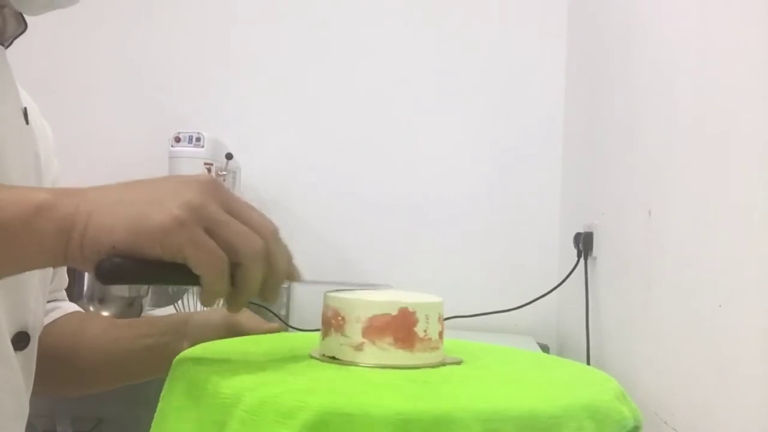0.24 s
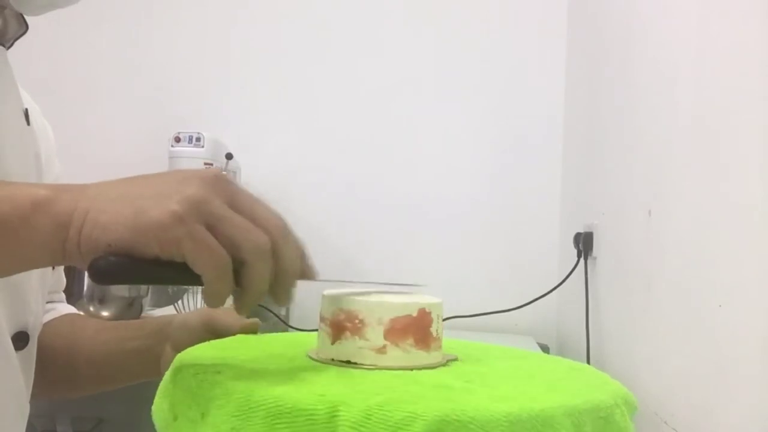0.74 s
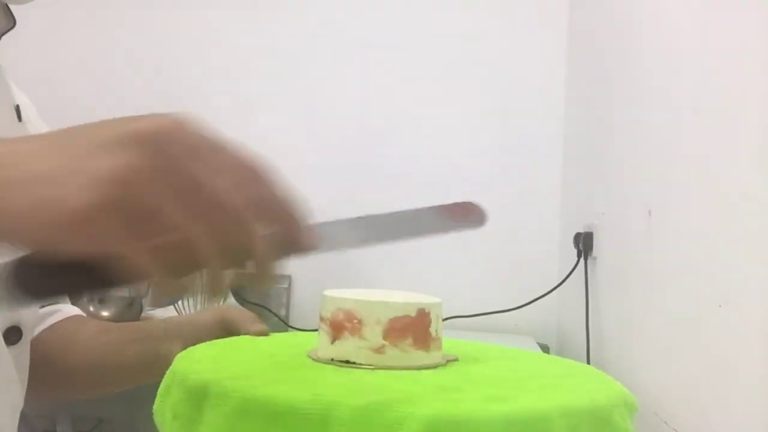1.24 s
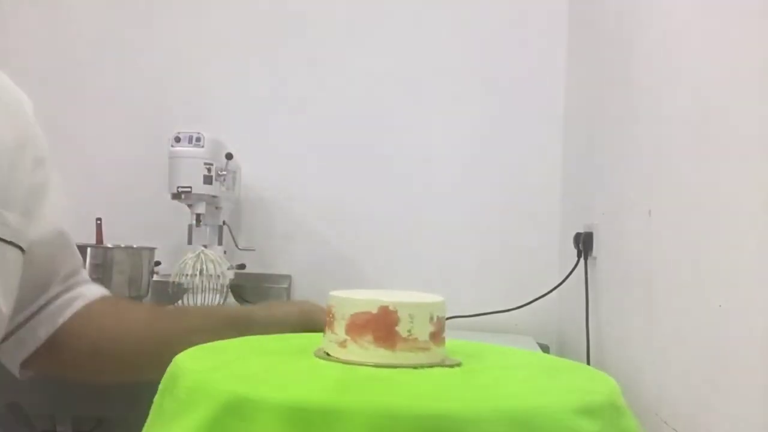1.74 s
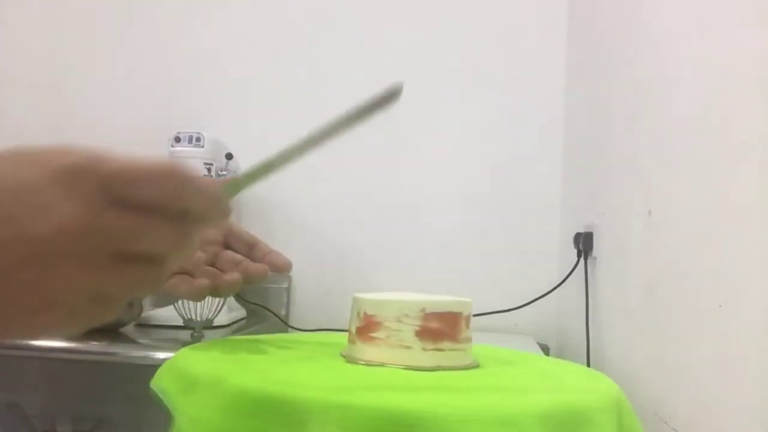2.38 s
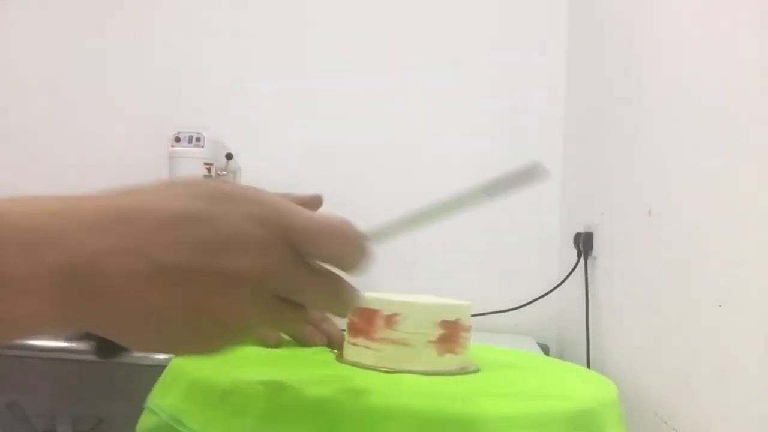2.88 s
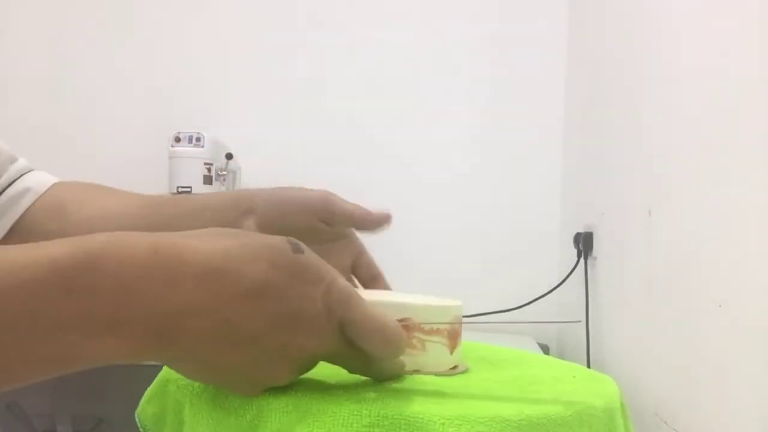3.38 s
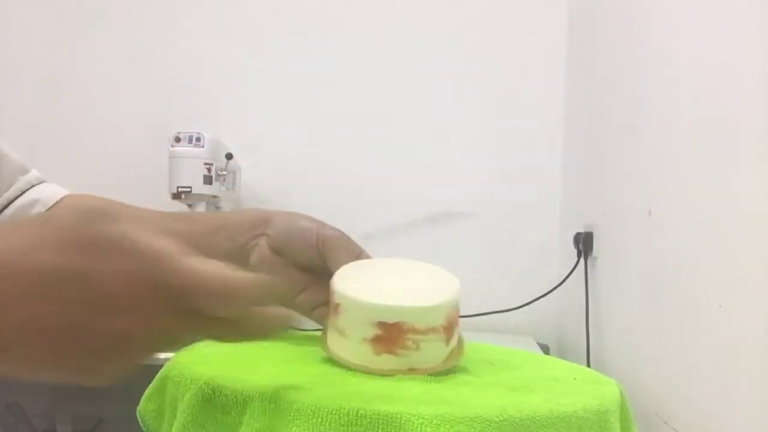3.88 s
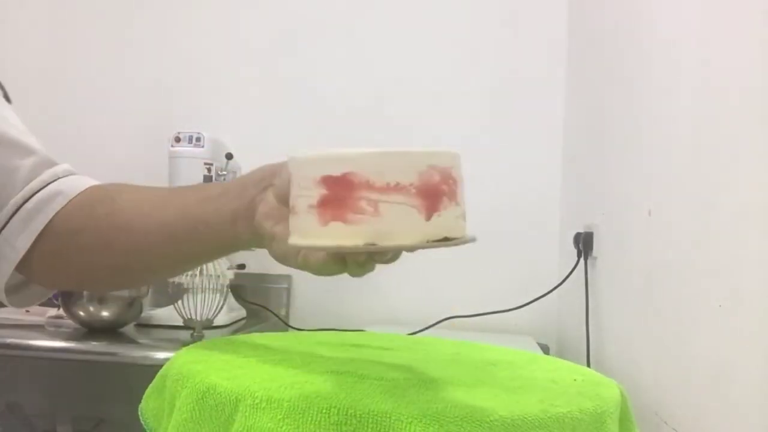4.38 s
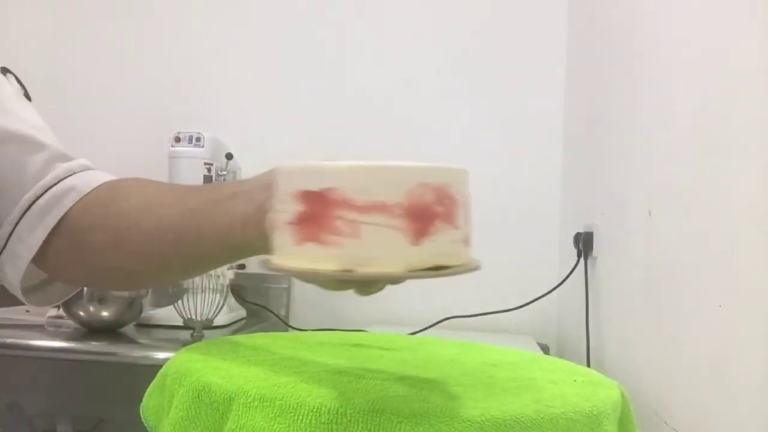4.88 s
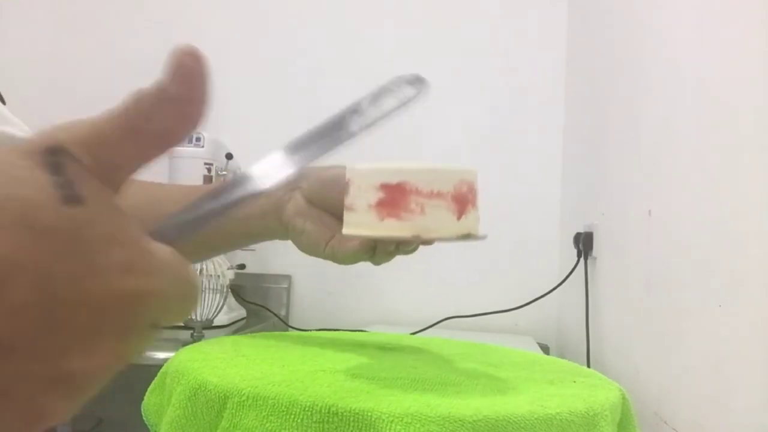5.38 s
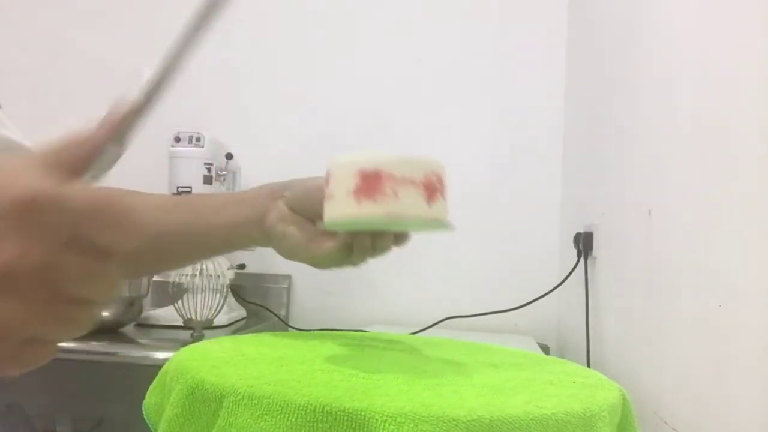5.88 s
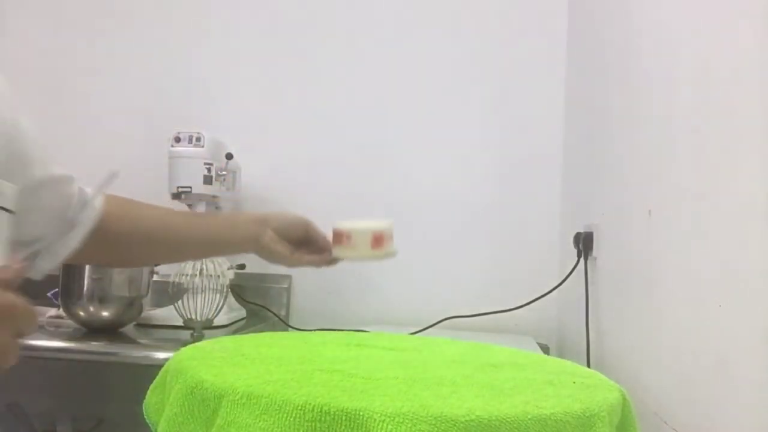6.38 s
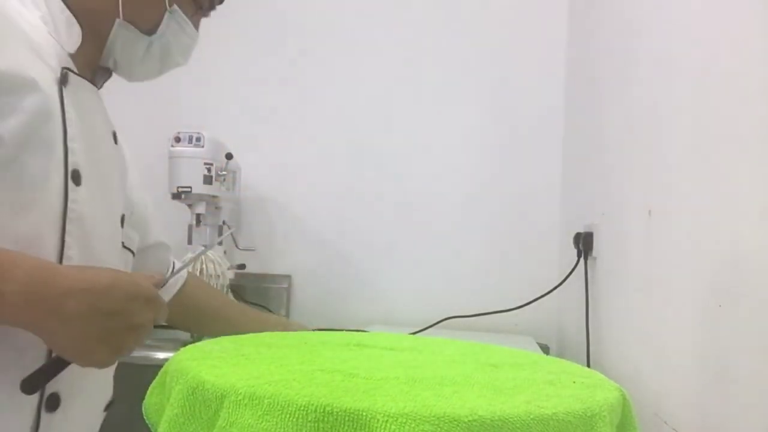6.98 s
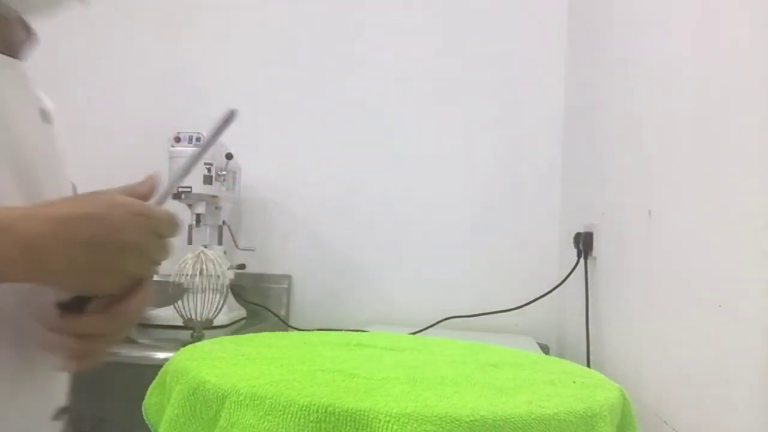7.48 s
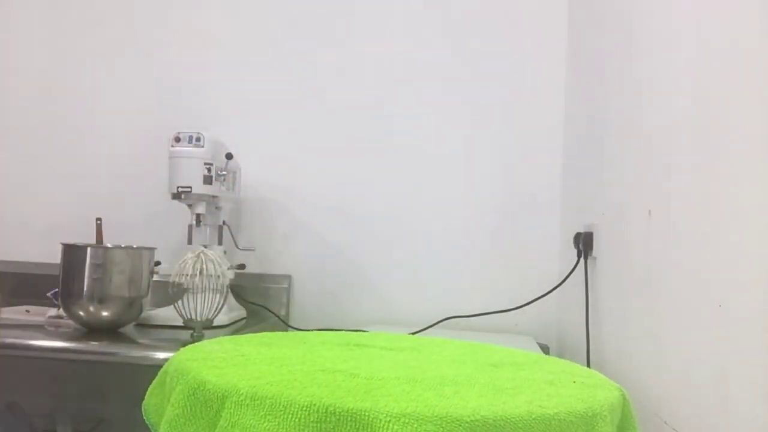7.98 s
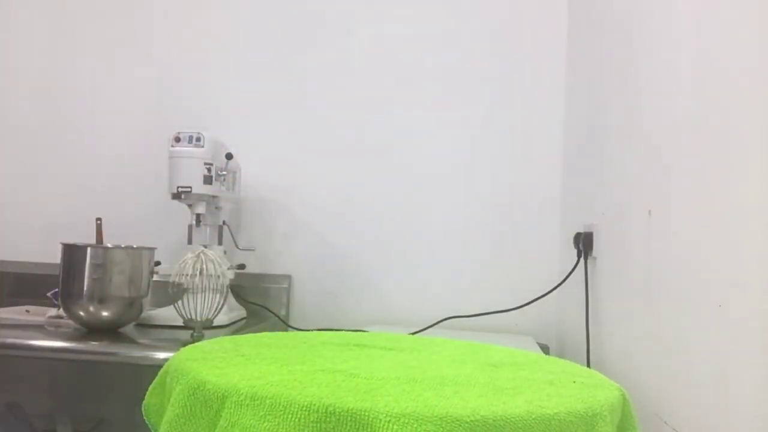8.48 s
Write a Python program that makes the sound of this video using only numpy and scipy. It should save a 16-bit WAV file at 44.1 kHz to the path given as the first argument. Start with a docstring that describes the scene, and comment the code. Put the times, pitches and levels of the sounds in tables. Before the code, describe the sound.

In a small bare-walled kitchen, a refrigerator hums low and slowly throbs, with a soft airy fan and faint fluttering electronic hiss. A clock ticks about once a second, each tick followed by a weaker one. Early on, a cake turntable rumbles under repeated pushes with a soft thud; later come faint knife clicks and small knocks, then only hum and ticking. Mono, slightly dull microphone close to the table.

```python
"""Small pastry kitchen: a refrigerator compressor hums and beats against the mains (summed cosines), its fan
stirs the air (shaped noise, wavering tones), and electronics add a thin hiss pulsing 30 times a second.
A cake turntable rumbles when pushed (swelling noise) amid soft knocks; a wall clock ticks (struck modes).
A palette knife clicks as the cake is lifted off (struck modes); late on, a sleeve brushes past (high noise).
"""
import sys
import numpy as np
from scipy import signal
from scipy.fft import rfft, irfft
from scipy.io import wavfile

SR = 44100
rng = np.random.default_rng(int(sys.argv[2]) if len(sys.argv) > 2 else 0)


def generate_wav(signal):
    """Clip the signal to [-1, 1] and save it as 16-bit WAV at the path in sys.argv[1]."""
    frames = np.transpose(np.atleast_2d(signal))
    scaled = np.clip(frames, -1, 1) * 32767
    pcm = np.round(scaled).astype(np.int16)
    wavfile.write(sys.argv[1], SR, pcm)


N = 385434
TIME = np.arange(N) / SR
FREQS = np.maximum(np.arange(N // 2 + 1) * SR / N, 1)

# compressor shaft orders: shaft_multiple, rms_db (once settled)
COMPRESSOR_ORDERS = [(1, -39.5), (2, -51.4), (3, -63), (4, -63), (8, -66.5), (11, -64.5)]
# fan tones: pitch_hz, nominal_rms_db
FAN_TONES = [(115.9, -56.5), (172.3, -58.5), (231.8, -60.5), (373, -61.5), (776, -77)]
# broadband rush of the fan: freq_hz, db_per_hz
AIR_SPECTRUM = [(15, -92.5), (33, -85.5), (52, -76), (85, -68), (135, -76.5), (300, -75.5), (400, -79.5),
                (450, -84), (600, -78), (950, -86.5), (1800, -92.5), (2300, -101), (3200, -113),
                (4900, -129), (9000, -150)]
# cabinet and room resonances added to the rush: freq_hz, width_hz, peak_db_per_hz
AIR_MODES = [(238.3, 17.6, -69), (337.8, 11, -68), (373.6, 13.4, -65.5), (1217, 97, -86.5),
             (2140, 410, -92), (3715, 180, -110), (4190, 390, -118)]
# steady electronic hiss: freq_hz, db_per_hz
HISS_SPECTRUM = [(2500, -122), (4000, -119), (4900, -129), (5300, -118.5), (5800, -119), (6400, -115),
                 (7600, -117.5), (8300, -122), (9600, -123.5), (10400, -129), (11200, -127), (14400, -126)]
# pulsed hiss at the crest of a pulse: freq_hz, db_per_hz
PULSE_SPECTRUM = [(1000, -105), (2200, -87.5), (3100, -107), (4000, -109), (4900, -120), (5500, -113),
                  (6600, -109), (7800, -112), (9200, -126), (14000, -138)]
# hand pushes the turntable or shifts the cake on it: peak_s, rumble_rms_db
PUSHES = [(.05, -43), (.85, -51), (1.13, -46.5), (1.68, -45), (1.88, -43), (2.17, -42), (2.42, -42.5),
          (2.96, -48), (3.14, -48), (3.35, -43)]
# turntable rumble, shape only: freq_hz, relative_db_per_hz
RUMBLE_SPECTRUM = [(20, -36), (36, -20), (52, 15.5), (75, 7.5), (110, -14), (170, -12), (300, -18.5),
                   (800, -78)]
# soft knocks on the table: start_s, strike_db, pitch_hz, t60_s
KNOCKS = [(1.845, -32.5, 139, .07), (4.659, -33, 290, 0.032), (6.762, -38, 270, 0.072)]
# clock case modes: pitch_hz, relative_db, t60_s
CLOCK_MODES = [(673, -56, .02), (1807, -33.5, 0.0077), (2140, -30, 0.009), (4070, -60.5, 0.0088),
               (6400, -55.5, .007), (7000, -57, .007), (7760, -57.5, 0.0052)]
# palette knife clicks: start_s, handle_strike_db, blade_strike_db
KNIFE_CLICKS = [(2.596, -56, -60), (4.7915, -41.5, -65), (4.7965, -45, -59), (5.1138, -60, -51)]
# blade modes: pitch_hz, relative_db, t60_s
BLADE_MODES = [(5400, -6, .007), (6300, -0.5, 0.0054), (7500, -5, .005), (9000, -4, 0.0033),
               (11200, -10.5, .003), (13000, -13, .003)]
# cloth swish, shape only: freq_hz, relative_db_per_hz
CLOTH_SPECTRUM = [(5000, -38), (8000, -4), (9500, 9), (13000, 4), (15000, -1)]

# the lowest order starts weak; HUM_SETTLE_S is a time constant
SHAFT_HZ, SLIP_HZ, IN_STEP_S = 49.37, 0.5834, 0.513
MAINS_HUM_RMS_DB, HUM_START_DB, HUM_SETTLE_S = -44.5, -4.5, 2.6
PULSE_RATE_HZ = 30
PUSH_RISE_DB_PER_S, COAST_DB_PER_S = 148, 32.5
FIRST_TICK_S, TICK_PERIOD_S, TICK_DB = 0.322, 1.00413, -4
RECOIL_DELAY_S, RECOIL_REL_DB = 0.1735, -7
SLEEVE_PEAK_S, SLEEVE_RMS_DB = 8.033, -78.5
SLEEVE_RISE_DB_PER_S, SLEEVE_FALL_DB_PER_S = 135, 480
# room share is relative to the direct sound
ROOM_T60_S, CLOCK_ROOM_DB, KNIFE_ROOM_DB = 0.16, -11, -8
CUTOFF_HZ = 14600


def from_db(db):
    """Decibels to amplitude gain."""
    return 10 ** (np.asarray(db) / 20)


def rms_one(x):
    """Scale to unit rms."""
    return x / np.sqrt(np.mean(x ** 2) + 1e-30)


def spectrum_gain(points):
    """Gain over FREQS, interpolated in dB over log frequency."""
    hz, db = np.transpose(points)
    return from_db(np.interp(np.log(FREQS), np.log(hz), db))


def noise(gain):
    """Gaussian noise with the given amplitude per root Hz."""
    white_spectrum = rfft(rng.standard_normal(N))
    return irfft(white_spectrum * gain, N) * np.sqrt(SR / 2)


def drift(rate_hz):
    """Slow random wander of unit rms, low-passed around rate_hz."""
    return rms_one(noise(1 / (1 + (FREQS / rate_hz) ** 2)))


def wavering_tone(hz, rms_db, waver):
    """Sine whose level and phase wander independently."""
    phase = 2 * np.pi * (hz * TIME + rng.random()) + waver * drift(2.1)
    level = from_db(rms_db) * (1 + waver * drift(3.0))
    return np.sqrt(2) * level * np.sin(phase)


def swell(peak_s, db, rise_db_per_s, fall_db_per_s):
    """Gain that climbs to a peak and dies away, both linear in dB."""
    since_s = TIME - peak_s
    loss_db = np.maximum(-since_s * rise_db_per_s, since_s * fall_db_per_s)
    return from_db(db - loss_db.clip(0, 200))


def strikes(times_s, dbs):
    """Single-sample impulses at the given moments."""
    out = np.zeros(N)
    index = np.round(np.asarray(times_s) * SR).astype(int)
    out[np.clip(index, 0, N - 1)] = from_db(dbs)
    return out


def ring(hits, hz, t60_s):
    """Two-pole resonator: a unit impulse starts a decaying sinusoid of height about 1."""
    radius = from_db(-60 / (t60_s * SR))
    angle = 2 * np.pi * hz / SR
    poles = [1, -2 * radius * np.cos(angle), radius ** 2]
    return signal.lfilter([0.5, 0, -0.5], poles, hits + 1e-18)  # offset avoids denormals


def struck_body(hits, modes, spread):
    """Parallel modes, each band-passed around its pitch so it swells over a few cycles."""
    out = np.zeros(N)
    for hz, db, t60_s in modes:
        band_hz = [hz / (1 + spread), min(hz * (1 + spread), SR / 2 - 100)]
        band_filter = signal.butter(2, band_hz, "band", fs=SR, output="sos")
        out += from_db(db) * signal.sosfilt(band_filter, ring(hits, hz, t60_s))
    return out


def kitchen_room(x, room_db):
    """Direct sound plus a short diffuse tail from bare walls: decaying noise of unit energy."""
    t = TIME[:SR // 2]
    decay = from_db(-60 * t / ROOM_T60_S) * (t > 0.004)  # tail starts after 4 ms
    tail = rng.standard_normal(len(t)) * decay
    return x + from_db(room_db) * signal.fftconvolve(x, tail / np.linalg.norm(tail))[:N]


def compressor():
    """The rotor slips behind the mains, so its second order beats with the magnetic hum."""
    turn = 2 * np.pi * SHAFT_HZ * (TIME - IN_STEP_S)
    slip = 2 * np.pi * SLIP_HZ * (TIME - IN_STEP_S)
    shaft = turn + 0.027 * drift(2)
    lowest, *upper = [from_db(db) * np.cos(round(k) * shaft) for k, db in COMPRESSOR_ORDERS]
    settling = from_db(HUM_START_DB * np.exp(-TIME / HUM_SETTLE_S))
    magnetic = from_db(MAINS_HUM_RMS_DB) * np.cos(2 * (turn + slip))
    return np.sqrt(2) * (lowest * settling + sum(upper) + magnetic)


def fan():
    """Turbulent air through cabinet and room resonances, with a few wavering tones."""
    power = spectrum_gain(AIR_SPECTRUM) ** 2
    for hz, width_hz, db in AIR_MODES:
        resonance = from_db(db) / (1 + 2 * ((FREQS - hz) / width_hz) ** 2)
        power = power + resonance ** 2
    tones = sum(wavering_tone(hz, db, waver=0.23) for hz, db in FAN_TONES)
    return noise(np.sqrt(power)) + tones


def electronics(delay_s=0.0043, width_s=0.0015):
    """Steady hiss, plus periodic noise bursts with a Gaussian envelope of sigma width_s."""
    period_s = 1 / PULSE_RATE_HZ
    since_s = (TIME - delay_s + period_s / 2) % period_s - period_s / 2
    pulse = np.exp(-0.5 * (since_s / width_s) ** 2)
    return noise(spectrum_gain(HISS_SPECTRUM)) + pulse * noise(spectrum_gain(PULSE_SPECTRUM))


def turntable():
    """Bearing rumble builds under each push and dies as the plate coasts; hands bump the table."""
    swells = [swell(s, db, PUSH_RISE_DB_PER_S, COAST_DB_PER_S) for s, db in PUSHES]
    motion = np.max(swells, axis=0)
    out = motion * rms_one(noise(spectrum_gain(RUMBLE_SPECTRUM)))
    for start_s, db, hz, t60_s in KNOCKS:
        out += struck_body(strikes([start_s], [db]), [(hz, 0, t60_s)], spread=0.54)
    return out


def clock():
    """About once a second the movement steps, then falls back more softly, ringing the case."""
    tick_s = np.arange(FIRST_TICK_S, N / SR - RECOIL_DELAY_S, TICK_PERIOD_S)
    steps = strikes(tick_s, TICK_DB)
    recoils = strikes(tick_s + RECOIL_DELAY_S, TICK_DB + RECOIL_REL_DB)
    return struck_body(steps + recoils, CLOCK_MODES, spread=0.14)


def palette_knife():
    """The handle gives a dull single-mode click, the hand-damped blade a bright one."""
    start_s, handle_db, blade_db = np.transpose(KNIFE_CLICKS)
    handle = struck_body(strikes(start_s, handle_db), [(2110, 0, 0.014)], spread=0.16)
    blade = struck_body(strikes(start_s, blade_db), BLADE_MODES, spread=0.22)
    return handle + blade


def sleeve():
    """Cloth friction: a brief, very high swish of shaped noise."""
    level = swell(SLEEVE_PEAK_S, SLEEVE_RMS_DB, SLEEVE_RISE_DB_PER_S, SLEEVE_FALL_DB_PER_S)
    return level * rms_one(noise(spectrum_gain(CLOTH_SPECTRUM)))


def scene():
    """Sum of all sources, one channel; clock and knife excite the room."""
    steady = compressor() + fan() + electronics()
    ticks = kitchen_room(clock(), CLOCK_ROOM_DB)
    knife_clicks = kitchen_room(palette_knife(), KNIFE_ROOM_DB)
    return (steady + turntable() + ticks + knife_clicks + sleeve())[None]


def record(dry):
    """Steep elliptic low-pass at CUTOFF_HZ."""
    low_pass = signal.ellip(10, 0.1, 80, CUTOFF_HZ, fs=SR, output="sos")
    return signal.sosfilt(low_pass, dry)


dry = scene()
out = record(dry)
generate_wav(out)
```